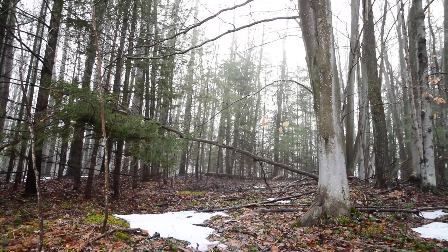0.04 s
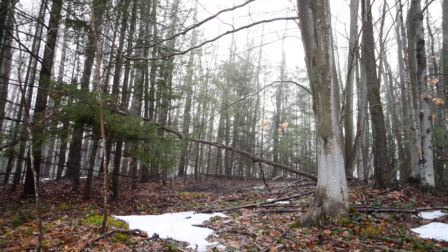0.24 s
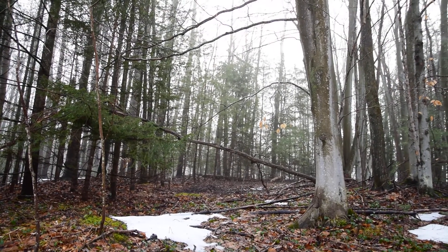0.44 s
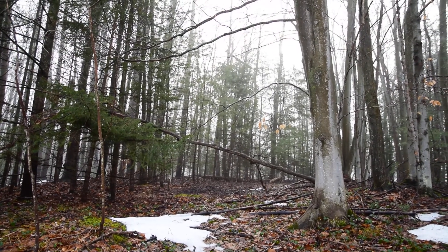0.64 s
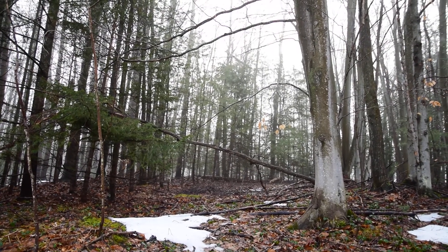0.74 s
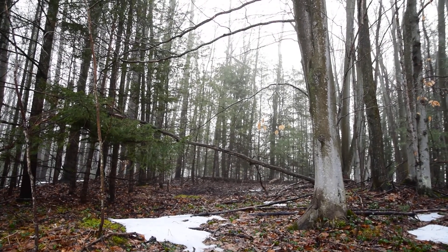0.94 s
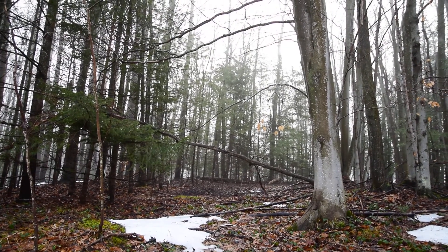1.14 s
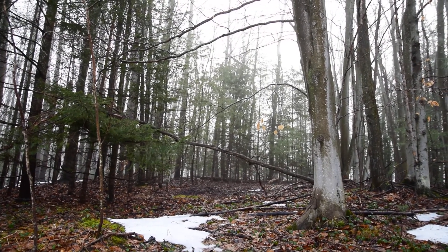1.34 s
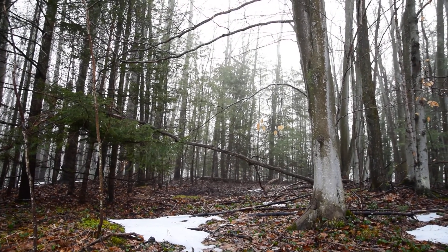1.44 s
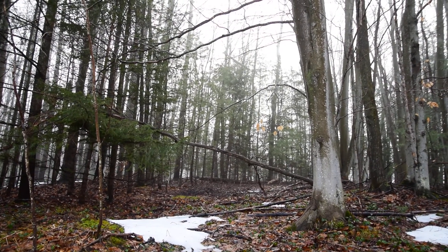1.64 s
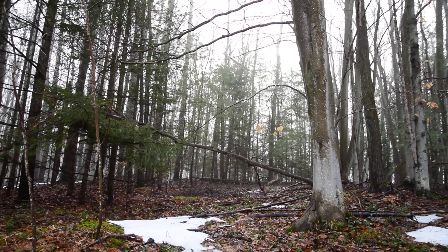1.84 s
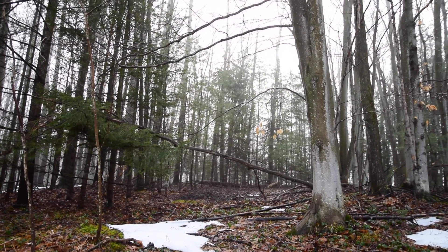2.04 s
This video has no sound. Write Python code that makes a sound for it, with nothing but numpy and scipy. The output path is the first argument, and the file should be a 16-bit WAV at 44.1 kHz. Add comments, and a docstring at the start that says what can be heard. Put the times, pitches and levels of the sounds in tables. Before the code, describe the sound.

A woodpecker drums on a hollow trunk, one roll of rapid knocks that speeds up slightly and fades, echoing among the trees. Faint far bird notes and a few drips sit behind it, over soft hiss and camera whirr.

```python
"""Woodpecker in a misty wood

A woodpecker drums one quickening, fading roll on a hollow trunk. Every blow of its bill
rings the same wood and echoes from the same trees. Far birds whistle and meltwater drips
on leaves nearby. Behind it all, a camera adds a grainy whirr, soft hiss and a thin high whine."""
import sys
import numpy as np
from scipy import signal
from scipy.fft import rfft, irfft, next_fast_len
from scipy.io import wavfile
from scipy.ndimage import map_coordinates

SR = 44100
rng = np.random.default_rng(int(sys.argv[2]) if len(sys.argv) > 2 else 0)


def materialize(psi):
    """Save the field psi as 16-bit PCM at rate SR to the path in sys.argv[1].

    A 1-D psi becomes a single channel; in a 2-D psi each row is a channel.
    """
    bounded = np.clip(np.atleast_2d(psi).T, -1, 1)
    quanta = np.round(bounded * 32767).astype(np.int16)
    wavfile.write(sys.argv[1], SR, quanta)


N = 92610  # 2.1 s

# tone colour of the hiss: f/Hz, relative level/dB
HISS_SHAPE = [(15, -84), (25, -27.5), (103, -13.5), (872, -5.5), (1200, -10.5), (1940, -12.5), (2220, -5.5),
              (2410, -13), (2680, -3.5), (4450, -18.5), (4820, -20), (7010, -16), (14800, -41)]
# how alike the hiss is in both ears: f/Hz, likeness (1 = the same)
HISS_LIKENESS = [(30, .15), (100, 0.33), (500, 0.65), (2000, .6), (8000, 0.58)]
# pitches at which the camera body rings: f/Hz, width/Hz, relative level/dB
BODY_TONES = [(1320, 350, -3.5), (2238, 71, -2.5), (2790, 250, -3), (3780, 440, -7.5), (4330, 75, -8),
              (4547, 38, -3.5), (5216, 100, -11.5), (6840, 56, -5.5), (7140, 120, -2), (7800, 150, -26),
              (8650, 63, -17.5), (8860, 230, -20.5)]
# how alike the whirr is in both ears: f/Hz, likeness
WHIRR_LIKENESS = [(60, 0.74), (180, 0.034), (550, 1), (1650, 0.68), (4970, -0.096), (15000, 0.46)]
# which way the whirr leans: f/Hz, left minus right/dB
WHIRR_BALANCE = [(60, -1.5), (180, 3), (550, -4), (1650, 2), (4970, 6.0), (15000, 0.5)]
# bird notes: middle t/s, length/s, f/Hz, glide/(Hz per s), level/dB
BIRD_NOTES = [(.095, 0.03, 1230, 4, -50.5), (1.078, 0.022, 3380, 6005, -47.5),
              (1.225, 0.014, 3600, -4000, -50), (1.48, .015, 3500, -10, -53)]
# drips: t/s, level/dB, centre f/Hz, width/octaves, splatter/dB, splatter fade/s, left minus right/dB
# (a fade is the time a sound takes to fall by 60 dB)
WATER_DRIPS = [(0.4466, -36, 8850, 1.2, -15.5, 0.062, -3), (1.043, -37, 6300, 0.6, -21, .04, 6),
               (1.9213, -29.5, 3950, 1.27, -14.5, 0.13, .5)]
# blurred echo of the far trees: f/Hz, fade/s, relative level/dB
FAR_ECHO = [(192, .4, -12.5), (293, 1.8, 8.5), (371, 2.1, -7.5), (445, 1.1, 3.5), (490, 1.1, -8.5),
            (560, 1.22, -1.5), (663, 1.8, -9), (850, 1.3, 7), (1400, 0.68, 0), (1570, 0.93, -6.5),
            (2820, 0.82, 6.5), (10000, 0.28, 1.5)]
# single echoes from the nearest trunks: delay/s, level/dB
NEAR_ECHOES = [(0.0068, -27.9), (0.0088, -17.9), (0.0109, -14.6), (0.0136, -23.5), (0.0153, -15.8),
               (0.0257, -27.1), (0.0278, -16.8), (0.0315, -24.4), (0.0383, -24.0), (0.0415, -22.3),
               (0.0477, -25.3), (0.0542, -22.2), (0.0563, -26.6), (0.0644, -28.5), (0.0693, -27.1),
               (0.0754, -25.5), (0.085, -30.0), (0.0916, -28.0), (0.1039, -22.8), (0.1519, -29.9),
               (0.1666, -27.6), (0.172, -30.1)]
# pitches at which the hollow trunk rings: f/Hz, relative level/dB, fade/s
TRUNK_TONES = [(301.7, -39.5, 0.18), (437.9, -15, 0.038), (518.5, 1, 0.034), (684.6, -4.5, 0.022),
               (987, -1.5, 0.018), (974, 2, .011), (1211.4, -0.5, 0.01), (1454, -6.5, 0.01),
               (1608, -6, 0.024), (2192, -22.5, 0.018), (2257.4, -19.5, 0.023), (2655, -27.5, 0.0067),
               (3035, -24, 0.022), (3540, -35.5, 0.0075), (4970, -26, 0.0086)]
# blows of the bill: t/s, strength/dB, contact time/ms
BILL_BLOWS = [(0.1995, -6, 0.2), (0.2959, -5.5, 0.12), (0.3867, -5.5, 0.12), (0.4767, -5, 0.14),
              (0.5627, -5.5, 0.14), (0.6467, -6, 0.11), (0.7282, -5.5, 0.097), (0.8097, -5, 0.16),
              (0.8893, -5.5, 0.17), (0.9668, -6, 0.14), (1.0441, -7, 0.13), (1.1193, -7, 0.18),
              (1.1958, -7.5, 0.2), (1.2706, -7, 0.27), (1.344, -7.5, 0.21), (1.4178, -8, 0.26),
              (1.4898, -8.5, 0.25), (1.5585, -8.5, 0.31), (1.6264, -10.5, 0.31), (1.6928, -10, 0.49),
              (1.7593, -10.5, 0.45), (1.8246, -10.5, 0.66)]


def amp(db):
    """Turn decibels into a factor to multiply by."""
    return 10 ** (np.asarray(db) / 20)


def unit(x):
    """Scale a signal to an average power of 1."""
    return x / np.sqrt(np.mean(x ** 2) + 1e-20)


def along(points, hz):
    """Read between (frequency, value) points on a scale of octaves."""
    f, values = np.transpose(points)
    return np.interp(np.log(hz + 1), np.log(f + 1), values)


def filtered(x, response):
    """Scale and shift each frequency in x by response(hz)."""
    size = next_fast_len(N + SR // 2)
    return irfft(rfft(x, size) * response(np.fft.rfftfreq(size, 1 / SR)), size)[..., :N]


def wobble(rate):
    """A smooth curve through `rate` random values a second."""
    return map_coordinates(rng.standard_normal(int(N * rate / SR) + 4), [np.arange(N) * rate / SR])


def spread(pair, likeness, balance):
    """Mix two unrelated signals into left and right with the given likeness and balance."""
    angle = lambda hz: np.arccos(np.clip(along(likeness, hz), -1, 1)) / 2
    mid, side = filtered(pair, lambda hz: np.array([np.cos(angle(hz)), np.sin(angle(hz))]))
    left_right = np.array([mid + side, mid - side])
    return filtered(left_right, lambda hz: amp(np.outer([.5, -.5], along(balance, hz))))


def air_hiss(level_db=-55):
    """Soft, steady air noise, a little to the left."""
    noise = filtered(rng.standard_normal((2, N)), lambda hz: amp(along(HISS_SHAPE, hz)))
    return amp(level_db) * unit(spread(noise, HISS_LIKENESS, balance=[(100, .6), (5000, 1.1)]))


def camera_whine(hz=15678, left_db=-75, right_db=-63.5):
    """One thin, high tone that swings opposite ways in the two ears."""
    tone = np.sqrt(2) * np.sin(2 * np.pi * hz * np.arange(N) / SR)
    return np.outer([-amp(left_db), amp(right_db)], tone)


def camera_whirr(level_db=-51.5, ticks_per_s=2500, top_hz=9150):
    """Tiny, irregular ticks set the camera body ringing."""
    def body(f):
        ringing = sum((-1) ** k * amp(db) * 1j * f * width / (hz * hz - f * f + 1j * f * width)
                      for k, (hz, width, db) in enumerate(BODY_TONES))
        return ringing / (1 + (f / top_hz) ** 6)

    ticks = (rng.random((2, N)) < ticks_per_s / SR) * rng.standard_normal((2, N))
    ticks *= amp(3 * wobble(170) + 0.5 * wobble(2.2))  # fast flicker, slow drift
    return amp(level_db) * unit(spread(filtered(ticks, body), WHIRR_LIKENESS, WHIRR_BALANCE))


def birds():
    """Far birds whistle short, soft notes that swell and fade."""
    out = np.zeros(N)
    for middle, length, hz, glide, db in BIRD_NOTES:
        t = np.arange(N) / SR - middle
        out += amp(db) * np.exp(-(2 * t / length) ** 2) * np.sin(2 * np.pi * (hz + glide * t / 2) * t)
    return out


def drips(top_hz=13300, tick_fade_s=.009, splatter_delay_s=.005):
    """Each drop hits the fallen leaves with a bright tick, then a soft splatter."""
    out, t = np.zeros((2, N)), np.arange(N) / SR
    for start, db, centre_hz, octaves, splatter_db, fade, pan_db in WATER_DRIPS:
        band = lambda hz: np.exp(-(np.log2((hz + 1) / centre_hz) / octaves) ** 2)
        noise = unit(filtered(rng.standard_normal((3, N)),
                              lambda hz: band(hz) / (1 + (hz / top_hz) ** 16)))
        age = np.maximum(t - start, 0)
        tick = (1 - np.exp(-age / 0.00044)) * amp(-60 * age / tick_fade_s)
        splatter_age = np.maximum(age - splatter_delay_s, 0)
        splatter = (1 - np.exp(-splatter_age / .004)) * amp(splatter_db - 60 * splatter_age / fade)
        drop = noise[0] * (tick + splatter) + .3 * noise[1:] * splatter  # the splatter sounds wider
        out += amp(db + np.array([[pan_db], [-pan_db]]) / 2) * drop
    return out


def far_trees(channels, rise_s=.022):
    """Countless echoes build up, then each frequency dies away at its own speed."""
    hz, t, spectrum = signal.stft(rng.standard_normal((channels, SR)), SR, nperseg=512)
    fade = along([(f, seconds) for f, seconds, _ in FAR_ECHO], hz)[:, None]
    level = along([(f, db) for f, _, db in FAR_ECHO], hz)[:, None]
    tail = signal.istft(spectrum * amp(level - 60 * t / fade), SR, nperseg=512)[1][:, :SR]
    build_up = 1 - np.exp(-(np.arange(SR) / SR / rise_s) ** 2)
    return tail * build_up / np.sqrt(SR / 16)


def forest(x, far_db=-9, sway_db=-15.5, side_db=-22.5, echo_lowest_hz=420):
    """A sound plus its echoes from near and far trees; swaying branches vary the far ones."""
    x = signal.lfilter(*signal.iirnotch(356.6, Q=5, fs=SR), x)  # the ground bounce cancels a low band
    echoes = lambda hz: sum(amp(db) * np.exp(-2j * np.pi * hz * delay) for delay, db in NEAR_ECHOES)
    near = filtered(x, lambda hz: 1 + echoes(hz) / (1 + (echo_lowest_hz / (hz + 1)) ** 10))
    feeds = np.array([x, x * wobble(1.7), x * wobble(4.4), x])
    still, slow_sway, fast_sway, side = signal.fftconvolve(feeds, far_trees(channels=4), axes=1)[:, :N]
    mid = near + amp(far_db) * (still + amp(sway_db) * (slow_sway + fast_sway))
    side = amp(far_db + side_db) * side
    return np.array([mid + side, mid - side]) * amp([[0.62], [-0.62]])  # a little to the left


def woodpecker(attack_s=.00026, scatter_db=.4, lowest_hz=380):
    """Each short push of the bill rings all the trunk's tones; the trunk gives off no bass."""
    out, t = np.zeros(N + SR), np.arange(SR // 8) / SR
    for start, db, contact_ms in BILL_BLOWS:
        ring = np.zeros(len(t))
        for k, (hz, level, fade) in enumerate(TRUNK_TONES):
            loudness = amp(level + scatter_db * rng.normal() - 60 * t / fade)
            sign = (-1) ** (k + 1)  # neighbouring tones swing opposite ways
            ring += sign * loudness * np.cos(2 * np.pi * hz * t)
        ring *= (1 - np.exp(-t / attack_s)) ** 2
        progress = t[:SR // 200] * 4000 / contact_ms
        push = progress ** 2 * np.exp(-progress)  # a longer push makes a duller knock
        out[round(start * SR):][:len(t)] += amp(db) * np.convolve(ring, push / push.sum())[:len(t)]
    return signal.sosfilt(signal.butter(4, lowest_hz, "high", fs=SR, output="sos"), out[:N])


def scene():
    """The drumming echoes through the forest, over the quieter sounds."""
    return forest(woodpecker()) + birds() + drips() + camera_whirr() + air_hiss() + camera_whine()


def record(dry):
    """Round off the peaks a little unevenly, thin the bass and cut the highest treble."""
    ceiling, knee, low_cut_hz, top_hz = 0.76, 3.8, 76, 16000
    rounded = dry / (1 + np.abs(dry / ceiling) ** knee) ** (1 / knee)
    lopsided = rounded + 0.0044 * rounded ** 2
    return filtered(lopsided, lambda hz: (hz < top_hz) * 1j * hz / (low_cut_hz + 1j * hz))


dry = scene()
out = record(dry)
materialize(out)
```